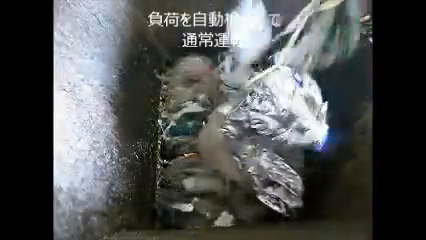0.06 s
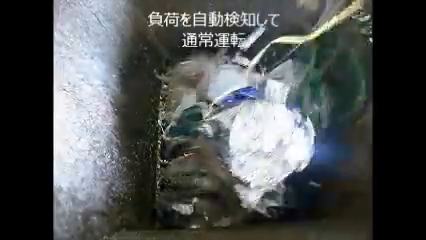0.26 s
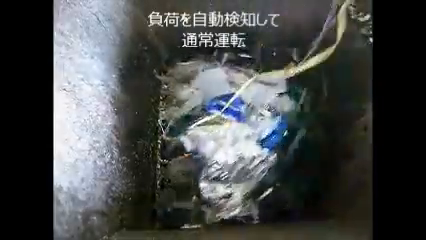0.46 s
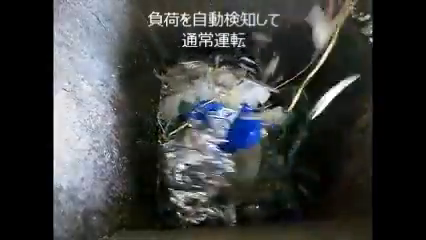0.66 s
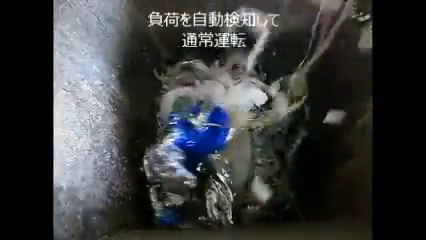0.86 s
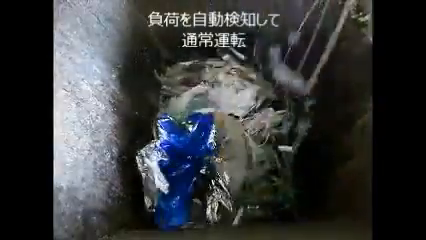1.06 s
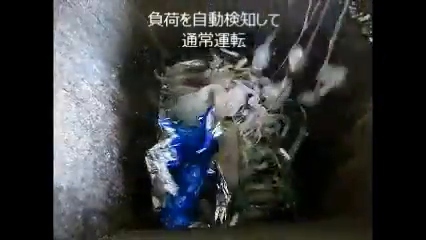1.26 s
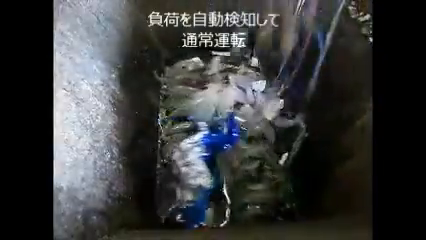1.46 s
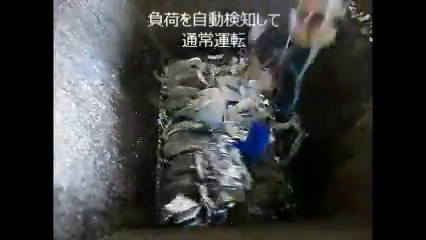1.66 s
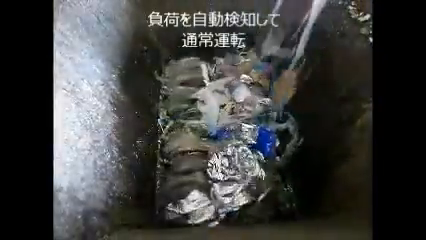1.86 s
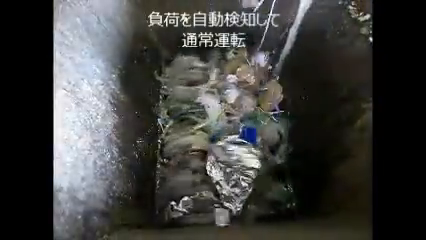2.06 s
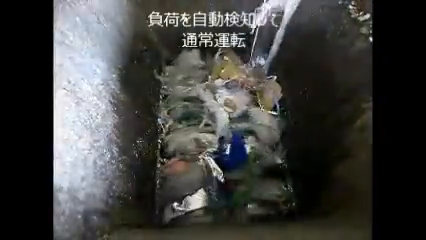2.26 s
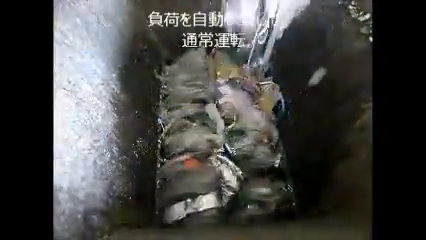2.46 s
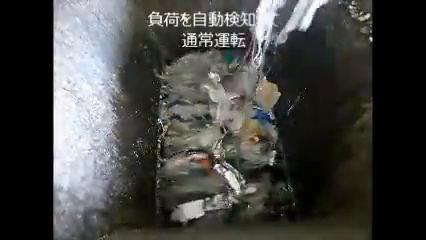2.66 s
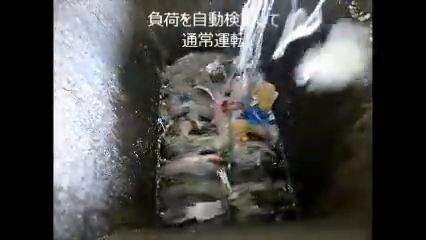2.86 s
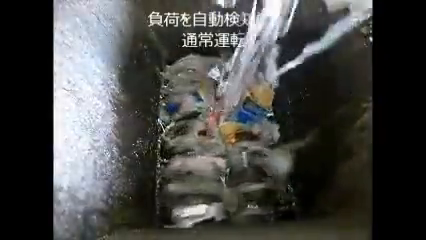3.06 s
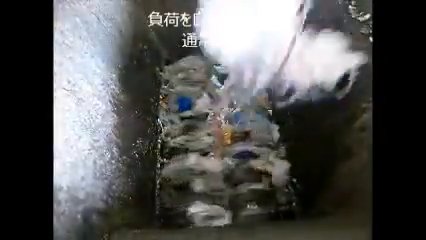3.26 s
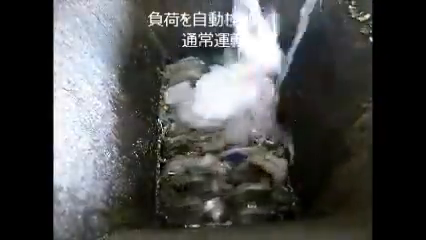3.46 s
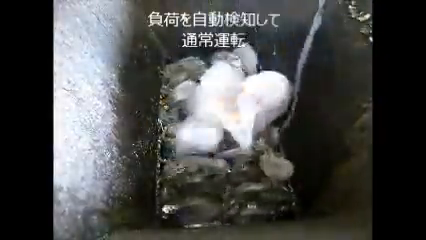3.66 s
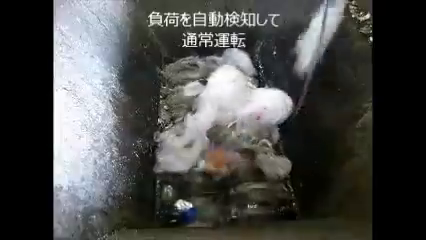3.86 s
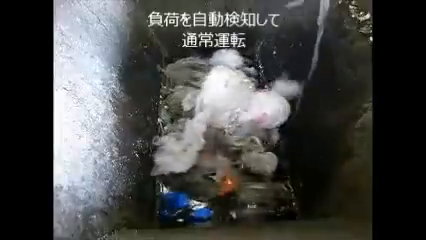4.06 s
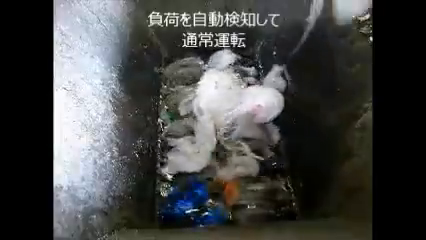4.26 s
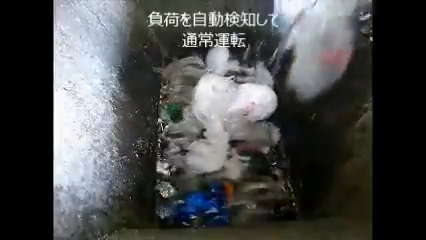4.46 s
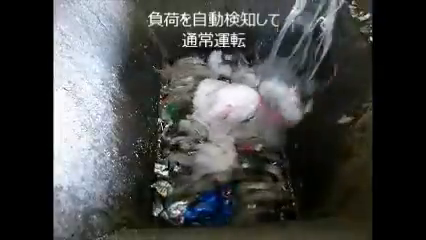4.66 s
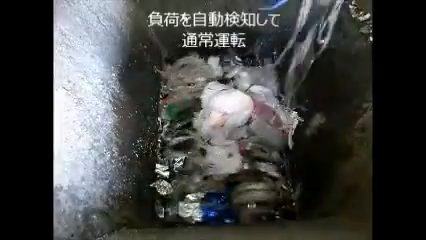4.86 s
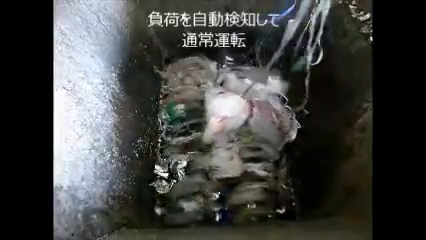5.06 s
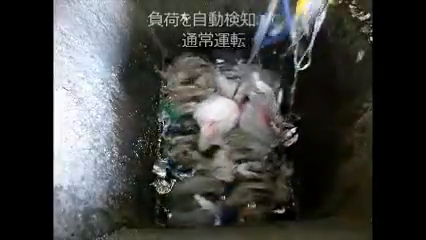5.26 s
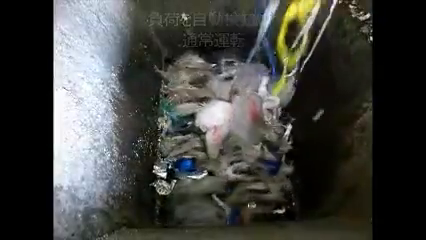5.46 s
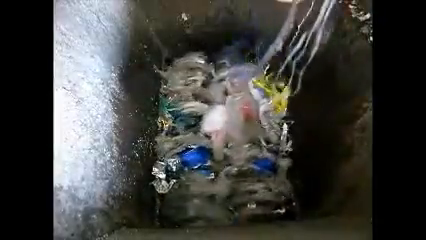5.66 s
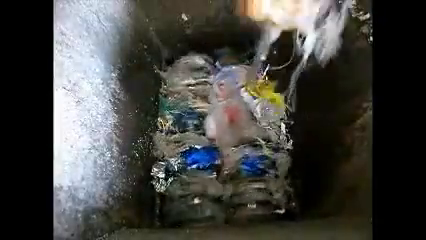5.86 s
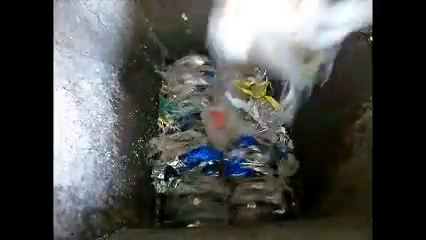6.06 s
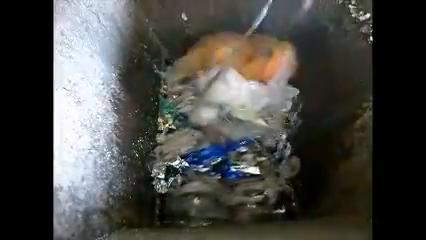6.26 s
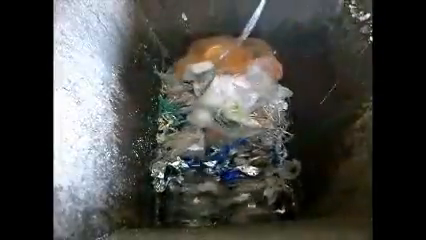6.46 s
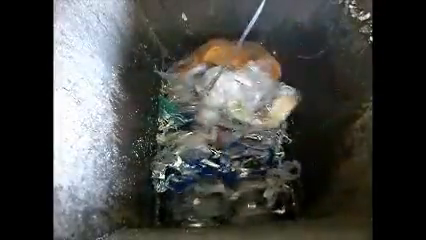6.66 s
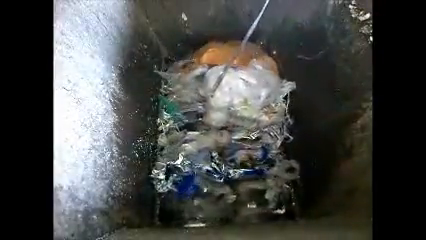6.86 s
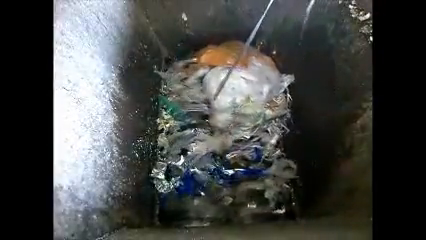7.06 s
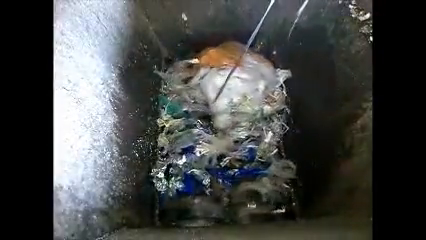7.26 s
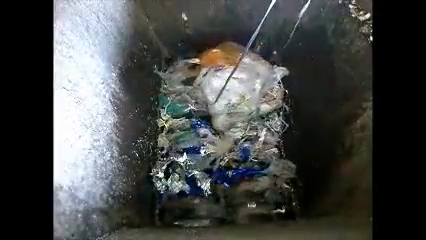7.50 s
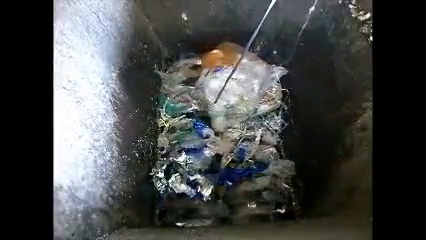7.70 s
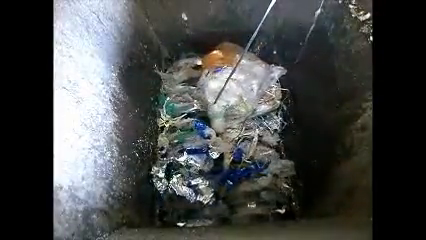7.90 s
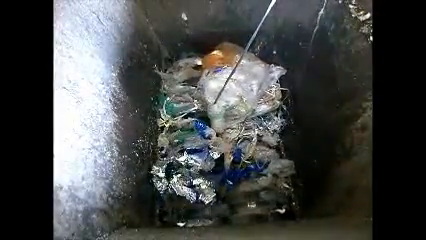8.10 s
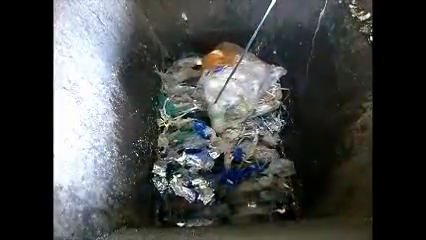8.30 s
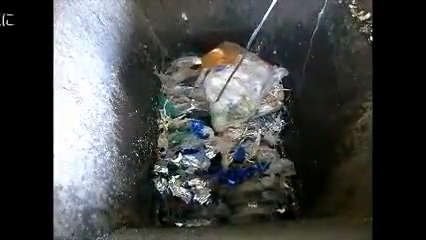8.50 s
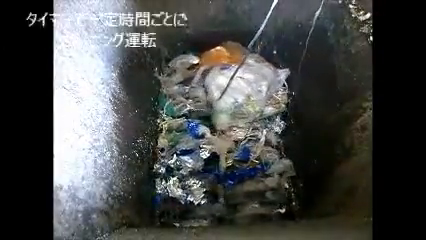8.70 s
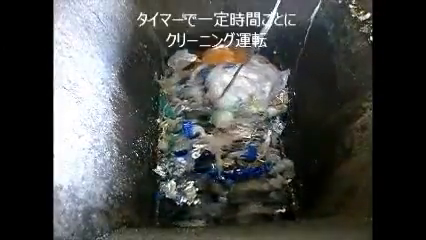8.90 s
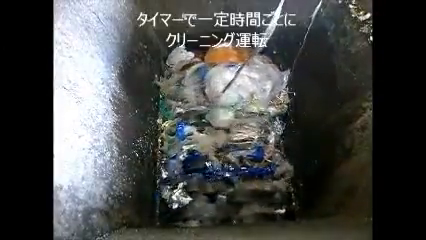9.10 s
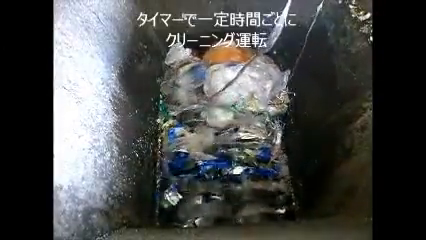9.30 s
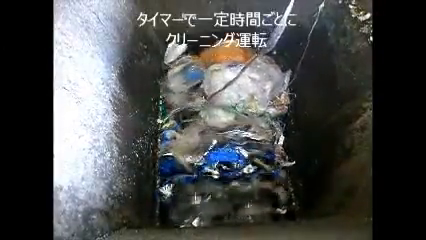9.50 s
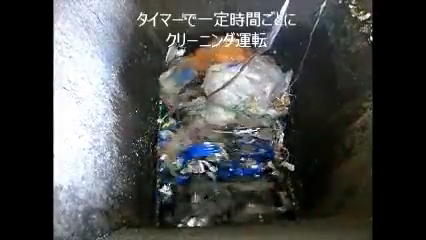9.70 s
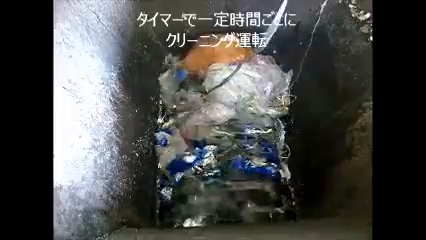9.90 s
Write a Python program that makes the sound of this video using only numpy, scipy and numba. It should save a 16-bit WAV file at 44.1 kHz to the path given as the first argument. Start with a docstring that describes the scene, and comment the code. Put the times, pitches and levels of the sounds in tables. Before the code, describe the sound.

From the start a large shredder is under full load, chewing plastic bags and bottles in a steel hopper: a dense, loud bed of crackling, crinkling and midrange crunching with a gritty, slightly uneven pulse. Hard snaps and cracks strike several times a second, some sharp clicks, others hollow thuds, especially thick around 1-2.5, 3.2-4 and 5-7 s. Short film rips and bottle buckles break through, with a strong crumple near 6.5 s. Brief plastic groans come around 3.1, 4.4 and 6.8 s; low frame rumble swells near 4.5 and 6.8-7.3 s. From about 7.7 s the din drops, quietest near 8.3 s, exposing motor and gear whine with sparse light ticks. Crunching rebuilds from 9 s, with overlapping squeaky groans from 9.4 s to the end. Close, narrow-band, mono and heavily limited, the din ducking after snaps; short metallic reflections.

```python
"""A twin-shaft shredder chews plastic bags and bottles at the bottom of a steel hopper, heard from its rim.
Film crinkles and rips, packed plastic crunches and groans between the cutters, and stiff pieces snap; the drive whines through a lull.
A narrow-band recorder limits every snap, so the din ducks and swells back after it."""
import sys
import numpy as np
from scipy import signal
from scipy.fft import rfft, irfft
from scipy.io import wavfile
from scipy.ndimage import uniform_filter1d, minimum_filter1d
from numba import njit

SR = 44100
rng = np.random.default_rng(int(sys.argv[2]) if len(sys.argv) > 2 else 0)


def log_audio(samples):
    """Write samples as a 16-bit WAV file to the path given in sys.argv[1]."""
    # one column per channel
    frames = np.atleast_2d(samples).T
    # limit to full scale, then quantise
    limited = np.clip(frames, -1, 1)
    pcm = np.round(limited * 32767).astype(np.int16)
    wavfile.write(sys.argv[1], SR, pcm)


N = 438353

# stiff pieces breaking: (s, level dB, ring of the piece Hz, length of the fracture ms, spit of treble dB; under -70 it is lost)
SNAPS = [(0.145, -3.5, 1860, 2.3, -71), (0.1711, -4.5, 2170, 2.5, -65), (0.216, 2, 790, 4, -43.5), (0.312, -2.5, 1920, 1, -60), (0.371, -3, 2120, 1.3, -86), (0.4028, -5.5, 1850, 1.7, -49),
         (.759, -18, 1900, 3.3, -62), (0.8495, -6.5, 1690, 1.7, -47), (0.886, -4.5, 1600, 2.8, -48), (0.9681, -1.5, 2150, 3.1, -60), (1.0386, -5.5, 2310, 1, -41),
         (1.0972, -10, 1140, 4.5, -60), (1.1659, 1.5, 745, 8.9, -49), (1.27, -4, 524, 4.4, -83), (1.3206, -2.5, 640, 2.5, -74), (1.351, 3, 1700, 2.3, -81),
         (1.358, -3, 820, 6.8, -81), (1.406, -9, 1160, 1.1, -85), (1.422, -6.5, 1620, 2.1, -85), (1.4608, -4, 2070, 1.8, -50), (1.552, 0, 756, 7.5, -51), (1.576, -5.5, 2000, 4.4, -79),
         (1.612, -3, 850, 2.5, -87), (1.6607, -11.5, 1940, 3.7, -47), (1.7212, -2.5, 790, 2.1, -51), (1.8939, -1.5, 1940, 2, -82), (1.927, -2.5, 584, 2.2, -85), (1.937, 0, 1870, 9.8, -76), (1.9635, 0.5, 1850, 1.5, -78),
         (2.0216, -8, 2800, 6, -44.5), (2.1021, -2.5, 1030, 5.9, -48), (2.1514, -10, 2480, 2.2, -45), (2.164, 4, 1770, 11.6, -52),
         (2.2712, -10, 764, 0.89, -53), (2.286, 1.5, 1900, 4.8, -47), (2.355, -5, 470, 3.8, -82), (2.3877, 2, 344, 7, -74), (2.443, -4, 1980, 5.7, -76),
         (2.486, -1, 910, 1.1, -61), (2.5932, -1, 2080, 6.6, -45.5), (2.7576, -6, 640, 3.7, -89), (2.81, -8, 790, 2.2, -50), (3.024, -12.5, 596, 1, -79), (3.14, -4, 800, 3.5, -56),
         (3.2268, -4, 1217, 14, -46), (3.3126, -2, 1770, 10, -41.5), (3.337, -2, 1660, 3.4, -46), (3.3557, -1, 750, 2.1, -57),
         (3.4026, -10, 610, 1.8, -85), (3.411, -3.5, 1190, 7.4, -53), (3.4873, -4, 600, 1.2, -85), (3.497, 6, 2100, 14, -56), (3.527, 0, 2200, 1.2, -85), (3.534, 5, 2420, 2.4, -83), (3.5558, -1, 2060, 3, -80),
         (3.675, -1.5, 2720, 0.78, -48), (3.7742, -4.5, 875, 3.3, -44), 
         (3.782, -4.5, 824, 3, -85), (3.8115, -2, 646, 3.1, -83), (3.8332, -5, 680, 2.5, -83), (3.8522, -15, 664, 2.7, -88), (3.866, -4.5, 684, 2.2, -85), (3.88, -8.5, 716, 3, -85), (3.8902, -9.5, 805, 1.14, -60), (3.921, -6, 2100, 1.3, -85), (3.9345, -4, 1260, 2.4, -56),
         (3.9866, -5, 1130, 1.2, -47), (4.1043, -5.5, 1880, 3, -56.5), (4.1258, 3, 1230, 0.85, -85), (4.1495, 1, 1330, 1.4, -68), (4.3347, -3, 1540, 2, -66),
         (4.6137, -2, 2350, 1.6, -45.5), (4.645, -3, 1050, 5.7, -75), 
         (4.772, -6, 670, 3.2, -84), (4.817, -9, 706, 2.4, -80), (4.9646, 0, 2870, 5, -86), (5.01, -11, 840, 2.5, -87), (5.0186, -5.5, 1080, 2.7, -85), (5.048, -7, 770, 4, -83), (5.066, -5.5, 635, 2.2, -86), (5.0964, -2.5, 480, 3.7, -47),
         (5.1455, -6, 2030, 1, -44), (5.219, -8, 824, 1.8, -85), (5.23, 0, 2250, 3.3, -52), (5.242, 1, 534, 3.8, -52), (5.291, -7.5, 2880, 3.4, -77),
         (5.327, -8, 2400, 2.6, -45.5), (5.336, 0, 1920, 1.7, -80), (5.36, -3, 1950, 3.5, -49), (5.3702, 3, 1030, 4.4, -55), (5.4507, -5, 864, 5.8, -42),
         (5.8223, -1.5, 560, 5.4, -44), (5.8457, 0, 950, 4.2, -89), (5.9183, -4.5, 1200, 1.6, -85), (6.0045, -1.5, 714, 0.58, -63), (6.1993, -3.5, 1470, 1.8, -53), (6.248, -3.5, 1030, 3.2, -43),
         (6.2955, 4.5, 2240, 4, -45), (6.311, -1, 2210, 4.3, -75), (6.363, -9, 935, 2, -85), (6.4583, 4, 970, 3.7, -43), (6.472, 3, 1060, 2.4, -77),
         (6.4955, 4.5, 900, 3.7, -77), (6.52, 2.5, 930, 9.8, -64), (6.5997, 0.5, 1200, 1.27, -54), (6.707, -2.5, 304, 6.2, -48.5),
         (6.827, -2, 463, 2.9, -51), (6.881, -2, 1945, 4.4, -40.5), (6.9068, -0.5, 610, 1, -85), (6.964, -7, 885, 1.9, -85),
         (6.985, -6, 2030, 2.4, -53.5), (6.995, -13, 2090, 1.9, -83), (7.0105, -3, 1200, 1.3, -73), (7.0337, -4, 640, 3.1, -75),
         (7.0686, -3.5, 2190, 3, -50), (7.369, -3, 1300, 2.9, -66), (7.4614, -2, 1340, 2.2, -46), (7.505, -7.5, 564, 4.2, -77),
         (7.599, -13, 1050, 2.9, -83.5), (7.7235, -7.5, 1420, 3.9, -76), (7.8165, -17, 2050, 3.4, -85), (7.8769, -11.5, 1110, 1.2, -83), (7.902, -18, 1357, 2.5, -85), (7.916, -13, 1110, 3.5, -80),
         (7.9256, -15, 1290, 5.9, -80), (7.9437, -11.5, 1120, 0.8, -76), (8.002, -13.5, 1680, 3, -87), (8.276, -15.5, 835, 4.6, -83), (9.026, -9, 2080, 5.3, -84),
         (9.0746, -22, 2170, 2.7, -88), (9.171, -26, 3600, 5, -88), (9.218, -18.5, 2330, 3, -88), (9.3799, -15.5, 2100, 3.8, -88), (9.4672, -16, 2030, 2.8, -88)]
# plastic rubbing on a cutter: (s, length s, first pitch Hz, last pitch Hz, level dB)
GROANS = [(1.83, 0.08, 362, 365, -26), (2.794, 0.046, 2330, 2250, -22), (3.085, 0.068, 300, 308, -21), (3.073, 0.08, 358, 349, -26), (3.1, 0.071, 637, 634, -21), (4.27, 0.067, 314, 340, -24),
          (4.396, 0.18, 337, 352.6, -25), (4.409, 0.04, 676, 680, -18), (4.472, 0.033, 480, 457, -23),
          (5.72, 0.13, 631, 680, -22.5), (6.16, 0.067, 838, 842, -23), (6.179, 0.053, 342, 346, -19), (6.747, 0.11, 349, 350, -24), (6.806, 0.086, 562, 545, -16),
          (9.44, .08, 552, 546, -23), (9.511, .11, 558, 566, -17.5), (9.591, .19, 590, 602, -21.5), (9.615, .085, 551, 560, -24), (9.53, 0.072, 770, 824, -21.5), (9.745, 0.077, 840, 857, -21), (9.743, 0.052, 277, 266, -18.5), (9.84, 0.085, 664, 694, -22), (9.886, 0.13, 287, 292, -19)]
# colour of the hopper: (Hz, dB)
HOPPER = [(40, -25), (72, -23), (100, -18), (145, -19.5), (185, -7), (240, 2.5), (290, 1.5), (375, 6.5), (490, 2), (680, 4.5), (1000, 1), (1500, -1.5), (2080, 3.5), (2800, -7), (3600, -10), (4500, -20.5), (6000, -46)]
# motor and gear tones: (Hz, dB rms)
DRIVE = [(98, -55.5), (142, -53.5), (195, -52), (349.6, -45.5), (418.9, -46), (465, -40.5), (560.1, -42.5), (699.8, -44.5), (748.3, -41), (866.1, -41), (1432.9, -46), (1625.6, -41.5), (2120.6, -42), (2762, -46), (3273, -48.5)]
BAND_HZ, TOP_HZ = 4540, 15200  # fixed
TIME = np.arange(N) / SR
# slow level of the din as the hopper fills and empties: (s, lows dB, low mids dB, high mids dB, treble dB)
DIN = [(0, -22.5, -19.5, -21, -15), (.4, -22.5, -21, -20, -15.5), (.8, -20, -20.5, -20.5, -15), (1.1, -21.5, -19, -20.5, -15), (1.35, -24, -20.5, -21.5, -14.5), (1.65, -23, -18.5, -19, -16.5),
       (2.3, -23, -18.5, -20.5, -18.5), (2.9, -22.5, -19.5, -21, -16.5), (3.2, -21.5, -19.5, -21.5, -19), (3.4, -24, -18.5, -19.5, -19), (3.57, -21.5, -18, -19, -12.5), (3.67, -22, -21, -22.5, -13), (3.851, -23, -18.5, -20, -21), (4.15, -21.5, -17, -20, -17),
       (4.45, -17, -17, -20, -20), (4.7, -21.5, -17, -21.5, -17), (4.95, -21, -20.5, -19.5, -15.5), (5.3, -23, -16.5, -22.5, -17.5), (5.8, -21.5, -18, -18, -17.5), (6.12, -24, -16, -20.5, -17),
       (6.35, -25.5, -25, -22.5, -15.5), (6.55, -24, -18, -19.5, -17.5), (6.63, -17.5, -16, -18.5, -16.5), (6.72, -18.5, -20.5, -21.5, -18.5), (7, -23, -20, -20.5, -16.5), (7.3, -22.5, -21, -21, -17), (7.55, -22.5, -22.5, -22.5, -18.5),
       (7.8, -27.5, -26, -28, -20.5), (8, -28, -23.5, -23.5, -23), (8.1, -29.5, -29, -29, -24.5), (8.3, -36, -27.5, -30, -29), (8.7, -32, -29, -29, -23), (9.1, -26.5, -25.5, -26.5, -20),
       (9.4, -24.5, -21, -24.5, -19.5), (9.75, -22.5, -20, -21.5, -19)]
GRAB_PER_S, GRAB_DB = 7.2, 0.26  # the hooks grab and slip: pace and depth
BRIGHTER_DB = -0.16  # tilt that a piece gains for each octave of its ring: slightly negative, so higher-ringing pieces come out a touch duller
SPIT_LOW_HZ, SPIT_SOFT_HZ = 3360, 1200  # the spit starts here and falls off above here
# small bits that break around the big pieces: count, level under the piece and its spread, time scatter, range of rings, fracture length
BIT_COUNT, BIT_DB, BIT_SPREAD_DB, BIT_SCATTER_S, BIT_LOW_HZ, BIT_HIGH_HZ, BIT_MS = 70, -9, 4, .1, 564, 2630, 2.54
GENTLE_RING = 0.18  # the gentler the break, the more the piece's ring stands over the crack (dB per dB)
RING_WANDER = 0.16  # the ring is unsteady while the piece deforms (radians a sample)
# depth of the quick flurries of cracks; level of the popping creases against them
FLURRY_DB, POP_DB = 2.9, -7.0  # fixed
JAG_DB, JAG_PER_S = 3.5, 1400  # a crack runs in fits: their spread and pace
DULL_RATIO = 4.7  # a crack is dull above this multiple of the piece's ring
RING_DB, RING_FALL_DB, HOLLOW_HZ = -1.0, 0.4, 950  # ring over crack: strongest at the pitch of hollow bottles, less for each octave away
RING_S = 0.00062  # the ring dies by 1/e in this time
# film ripping: (s, length s, level dB, ring of the sheet Hz)
TEARS = [(0.422, 0.16, -28, 2590), (.6, 0.094, -21, 2300), (0.742, 0.084, -24.5, 2880), (0.989, 0.086, -22, 2260), (1.6, 0.051, -42, 3000), (1.947, 0.074, -26, 2940), (2.802, 0.079, -19.5, 2300), (2.903, 0.078, -22, 2670),
         (3.59, .08, -32, 2150), (4.223, 0.11, -33, 2670), (4.912, 0.12, -26, 2990), (5.538, 0.15, -25, 2900), (6.297, 0.024, -15, 2230), (7.146, 0.15, -36, 2270)]
TEAR_PER_S, TEAR_DRIFT, TEAR_WIDTH_HZ = 430, 0.12, 680  # pace of the rips, drift of the ring as a share, its width
RING_WIDTH_SHARE, RING_WIDTH_SPREAD_DB = .42, 4  # width of the ring over its pitch; how pieces differ in damping
THIN_RATIO = .3  # a piece radiates little below this multiple of its ring
# hollow bottles buckling: (s, length s, level dB, ring of the bottle Hz)
CRUMPLES = [(1.59, 0.069, -19, 800), (2.62, .07, -29, 1030), (3.15, 0.057, -26, 1050), (3.335, 0.054, -22, 900), (3.77, .13, -26, 720), (4.42, .12, -24, 696), (6.225, 0.029, -20, 1160), (6.465, .04, -10, 956)]
CRUMPLE_PER_S, CRUMPLE_DRIFT, CRUMPLE_WIDTH_HZ = 260, .1, 200  # pace of the buckles, drift of the ring as a share, its width
# level of the frame's low rumble: (s, dB)
RUMBLE = [(0, -48.5), (1.3, -50), (3.4, -44), (4.45, -36.5), (5.2, -44), (6.4, -44), (6.8, -38.5), (7.35, -39.5), (7.9, -46.5), (8.4, -51), (8.85, -43.5), (9.65, -41)]
RUMBLE_LOW_HZ, RUMBLE_HIGH_HZ, RUMBLE_DEEP_DB = 152, 240, -10  # main band of the rumble; level of the octave under it


def undb(db):
    """Decibels to gain."""
    return 10 ** (np.asarray(db) / 20)


def unit(x):
    """Scale to rms 1."""
    return x / np.sqrt(np.mean(x ** 2) + 1e-18)


def walk(rate):
    """Random levels held 1 / rate s and slewed twice; spread 1."""
    k = int(SR / rate)
    return unit(uniform_filter1d(uniform_filter1d(np.repeat(rng.standard_normal(N // k + 1), k), k), k)[:N])


def band(x, lo_hz, hi_hz, order=4):
    """Band-pass without delay, so that neighbouring bands add up evenly."""
    return signal.sosfiltfilt(signal.butter(order, [lo_hz, hi_hz], "band", fs=SR, output="sos"), x)


def resonate(x, hz, width_hz):
    """One resonance, gain 1 at its centre."""
    return signal.lfilter(*signal.iirpeak(hz, hz / width_hz, fs=SR), x)


def hopper(x, tilt_db=0, size=4096):
    """Causal response with the hopper's colour, tilted around 1 kHz."""
    octave = np.log2(np.maximum(np.arange(size // 2 + 1) * SR / size, 1))
    hz, db = np.transpose(HOPPER)
    slope = np.clip(octave - np.log2(1000), -1.3, 1.3)  # fixed
    cepstrum = irfft(np.log(undb(np.interp(octave, np.log2(hz), db) + tilt_db * slope)))
    cepstrum[1:size // 2] *= 2
    cepstrum[size // 2 + 1:] = 0
    return signal.fftconvolve(x, irfft(np.exp(rfft(cepstrum))))[:len(x)]


def walls(x, wet_db, t60, count=8):
    """Dense short reflections between the steel walls, different for each place along the cutters."""
    t = TIME[:SR // 6]
    place = np.repeat(rng.integers(count, size=N // 256 + 1), 256)[:N]  # fixed
    wet = 0
    for k in range(count):
        echoes = rng.standard_normal(len(t)) * undb(-60 * t / t60) * (t > .002)  # fixed
        wet = wet + signal.fftconvolve(x * uniform_filter1d(1. * (place == k), size=128), echoes / np.linalg.norm(echoes))[:N]
    return x + undb(wet_db) * wet


def clicks(rate, spread_db):
    """Random tiny fractures: many small ones, a few large."""
    size = undb(spread_db * np.minimum(rng.exponential(size=N), 5))  # fixed
    return unit((rng.random(N) < rate / SR) * size * rng.choice([-1, 1], N))


def folds(spread_db, ring_s, count=24000):
    """Buckling folds of film, each ticking at a pitch of its own."""
    when, pitch, size = rng.random((count, 3)).T
    t = TIME[:256]
    hz = 200 + 4000 * pitch  # fixed
    gain = undb(spread_db * np.minimum(-np.log(1 - size), 5)) * rng.choice([-1, 1], count)  # fixed
    grains = gain[:, None] * np.sin(2 * np.pi * hz[:, None] * t) * np.exp(-t / ring_s)
    at = (when * N).astype(int)[:, None] + np.arange(len(t))
    return unit(np.bincount(at.ravel(), grains.ravel())[:N])


def chewing():
    """Broad cracks and pitched folds come in flurries as the hooks grab and slip; running light, they are even."""
    lows_db, mids_db, high_mids_db, treble_db = din_levels()
    load = np.minimum(undb(high_mids_db + 16.5), 1)
    cracks = clicks(rate=1500, spread_db=2.0) + undb(-7.0) * folds(spread_db=1.0, ring_s=0.00076)
    flurries = unit(cracks * undb(FLURRY_DB * load * (np.tanh(1.2 * walk(130)) + 0.16)))
    din = hopper(walls(flurries + undb(POP_DB) * load * pops(spread_db=9, cycles=1.4), wet_db=-5, t60=0.1))
    rumble = unit(band(din, 100, 430)) * undb(lows_db - 2.5 + 0.32 * walk(25))
    crunch = unit(band(din, 457, 833)) * undb(mids_db - 4.0 + 1.2 * load * walk(35))
    tearing = unit(band(din, 843, 1664)) * undb(high_mids_db - 3.0 + 1.0 * load * walk(35))
    crinkle = unit(band(din, 1675, 7500)) * undb(treble_db - 3.5 + 0.2 * load * walk(35))
    return (rumble + crunch + tearing + crinkle) * undb(GRAB_DB * load * walk(GRAB_PER_S))


def snaps():
    """Big pieces and small bits break between the steel walls."""
    out = np.zeros(N + SR)
    for s, db, hz, ms in [row[:4] for row in SNAPS] + small_bits():
        snap, start = fracture(db, hz, ms), int(s * SR)
        out[start:start + len(snap)] += snap * undb(0.5)
    return walls(out[:N], wet_db=-8.5, t60=0.043)


def groans():
    """Stick and slip on a cutter: a short unsteady tone that glides as the plastic stretches."""
    out, waver, grip = np.zeros(N), walk(90), undb(2.0 * walk(50))
    for s, length, first_hz, last_hz, db in GROANS:
        at = slice(int(s * SR), int((s + length) * SR))
        progress = (TIME[at] - s) / length
        hz = (first_hz + (last_hz - first_hz) * progress) * (1 + .01 * waver[at])  # fixed
        phase = 2 * np.pi * np.cumsum(hz) / SR
        swell = np.sqrt(np.abs(np.sin(np.pi * progress)))
        out[at] += undb(db) * swell * grip[at] * (np.sin(phase) + 0.22 * np.sin(2 * phase))
    return out


def drive():
    """Motor and gear teeth: steady when running light, jolted in speed under load."""
    strain = undb(din_levels()[0] + 21) ** 2
    turns = np.cumsum(1 + (.0015 + .025 * strain) * walk(15)) / SR
    return sum(undb(db - 0.9 + 1.4 * walk(12)) * np.sqrt(2) * np.sin(2 * np.pi * hz * turns) for hz, db in DRIVE)


def spits():
    """A gritty tick of treble at the height of each fracture, with a short tail, falling off towards the top."""
    power = np.zeros(N)
    for s, _, _, ms, db in SNAPS:
        at = slice(int(s * SR) - SR // 50, int(s * SR) + SR // 25)  # fixed
        t = TIME[at] - s - ms / 3000  # fixed
        width = 0.0013 + .00006 * ms
        tail = (t > 0) * np.exp(-np.abs(t) / 0.0064) * undb(-29.5)
        power[at] += undb(db + 7.0) ** 2 * (np.exp(-np.abs(t) / width) + tail)
    grit = signal.sosfilt(signal.butter(1, SPIT_SOFT_HZ, fs=SR, output="sos"), clicks(rate=8600, spread_db=3.0))
    grit = signal.sosfilt(signal.butter(4, SPIT_LOW_HZ, "high", fs=SR, output="sos"), grit)
    return unit(grit) * np.sqrt(power) * undb(1.7 * walk(400))


def din_levels():
    """Levels of the lows, low mids, high mids and treble at every moment, dB."""
    s, *levels = np.transpose(DIN)
    return [np.interp(TIME, s, db) for db in levels]


def fracture(db, hz, ms):
    """A crack runs in fits through a stiff piece for a few milliseconds and rings it; db is its loudest moment."""
    t = TIME[:SR // 20]
    run = t / (ms / 1000)  # fixed
    fits = undb(JAG_DB * rng.standard_normal(len(t)))[(t * JAG_PER_S).astype(int)]
    force = 1 / (1 + (run / 0.65) ** 6)
    crack = signal.sosfilt(signal.butter(2, min(DULL_RATIO * hz, SR / 3), fs=SR, output="sos"), force * fits * rng.standard_normal(len(t)))
    body = unit(hopper(signal.sosfilt(signal.butter(1, THIN_RATIO * hz, "high", fs=SR, output="sos"), crack), BRIGHTER_DB * np.log2(hz / 1300)))
    swing = signal.lfilter([1], [1, -np.exp(-1 / (RING_S * SR))], force * fits)
    ring = swing * np.sin(2 * np.pi * hz * t + RING_WANDER * np.cumsum(rng.standard_normal(len(t))))
    ring = unit(resonate(ring, hz, hz * RING_WIDTH_SHARE * undb(RING_WIDTH_SPREAD_DB * rng.uniform(-1.8, 1.5))))
    ring_db = RING_DB - RING_FALL_DB * abs(np.log2(hz / HOLLOW_HZ)) + GENTLE_RING * max(-db - 5, 0)
    snap = body + undb(ring_db) * ring
    return snap * undb(db) / np.sqrt(uniform_filter1d(snap ** 2, size=132).max())


def small_bits():
    """Rows (s, dB, Hz, ms) of lesser snaps that lead up to and follow the breaking of a big piece."""
    rows = []
    for piece, when, size, ring, length in rng.random((BIT_COUNT, 5)):
        s, db = SNAPS[int(piece * len(SNAPS))][:2]
        rows.append((max(s + BIT_SCATTER_S * (2 * when - 1), 0), min(db, -2) + BIT_DB + BIT_SPREAD_DB * (2 * size - 1),
                     BIT_LOW_HZ * (BIT_HIGH_HZ / BIT_LOW_HZ) ** ring, BIT_MS * (.5 + length)))
    return rows


def tears():
    """Stretched film gives way in a ragged run of rips."""
    return walls(ragged_runs(TEARS, TEAR_PER_S, TEAR_DRIFT, TEAR_WIDTH_HZ), wet_db=-5.5, t60=0.045) * undb(-4.5)


def ragged_runs(rows, per_s, drift_share, width_hz):
    """Runs of tiny failures that all ring the same piece; its ring drifts as it deforms."""
    out, drift, t = np.zeros(N + SR), walk(30), TIME[:512]
    for s, length, db, hz in rows:
        rip, start = np.zeros(int(length * SR) + len(t)), int(s * SR)
        for when, size in rng.random((int(length * per_s), 2)):
            at = int(when * length * SR)
            tick = np.sin(2 * np.pi * hz * (1 + drift_share * drift[start + at]) * t) * np.exp(-np.pi * width_hz * t)
            rip[at:at + len(t)] += tick * undb(9 * size) * np.sqrt(np.sin(np.pi * when))
        out[start:start + len(rip)] += unit(resonate(rip, hz, hz)) * undb(db)
    return out[:N]


def crumples():
    """A bottle caves in, buckle after buckle, with a hollow crunch."""
    return walls(ragged_runs(CRUMPLES, CRUMPLE_PER_S, CRUMPLE_DRIFT, CRUMPLE_WIDTH_HZ), wet_db=-1, t60=0.04) * undb(-3.5)


def pops(spread_db, cycles, count=2000):
    """Creases popping through: separate grains of a few cycles, each at a pitch of its own."""
    when, pitch, size = rng.random((count, 3)).T
    t = TIME[:512]
    turns = (1200 * 3 ** pitch)[:, None] * t  # fixed
    grains = undb(spread_db * size)[:, None] * np.sin(2 * np.pi * turns) * np.exp(-turns / cycles)
    at = (when * N).astype(int)[:, None] + np.arange(len(t))
    return unit(np.bincount(at.ravel(), grains.ravel())[:N])


def rumble():
    """The frame shudders with the drag on the shafts."""
    body, deep = (unit(band(rng.standard_normal(N), lo, hi, order=2)) for lo, hi in ((RUMBLE_LOW_HZ, RUMBLE_HIGH_HZ), (72, 135)))
    return (body + undb(RUMBLE_DEEP_DB) * deep) * undb(np.interp(TIME, *np.transpose(RUMBLE)) + 1.5 * walk(9.5))


def scene():
    """Everything in the hopper, one channel."""
    return (chewing() + tears() + crumples() + snaps() + groans() + drive() + rumble())[None]


@njit
def follow(x, attack, release):
    """Peak follower: quick up, slow down."""
    out, e = np.empty(len(x)), 0.
    for i in range(len(x)):
        e += (x[i] - e) * attack if x[i] > e else -e * release
        out[i] = e
    return out


def limiter(x, ceiling_db, attack_s, release_s):
    """Turns down just ahead of each peak and recovers over some tens of milliseconds."""
    peak = follow(np.abs(x), min(1 / (attack_s * SR), 1), 1 / (release_s * SR))
    ahead = -minimum_filter1d(-peak, size=25)
    return x / np.maximum(uniform_filter1d(ahead, size=25) / undb(ceiling_db), 1)


def round_off(x, knee, room):
    """Straight up to the knee, then saturating."""
    over = np.maximum(np.abs(x) - knee, 0)
    return x - np.sign(x) * (over - room * np.tanh(over / room))


def record(dry):
    """Narrow-band microphone and limiter; the peaks are rounded, and the treble spits on the sharpest snaps."""
    thin = signal.sosfilt(signal.butter(2, 60, "high", fs=SR, output="sos"), dry[0])
    loud = round_off(limiter(thin, ceiling_db=-4.5, attack_s=0.00013, release_s=0.053), knee=0.58, room=0.25)
    dull = signal.sosfiltfilt(signal.butter(16, BAND_HZ, fs=SR, output="sos"), loud)
    return signal.sosfilt(signal.ellip(8, .2, 70, TOP_HZ, fs=SR, output="sos"), dull + spits())[None]


dry = scene()
out = record(dry)
log_audio(out)
```